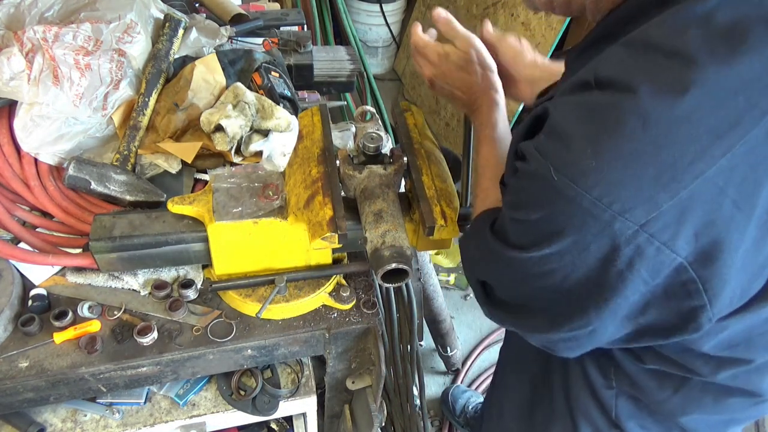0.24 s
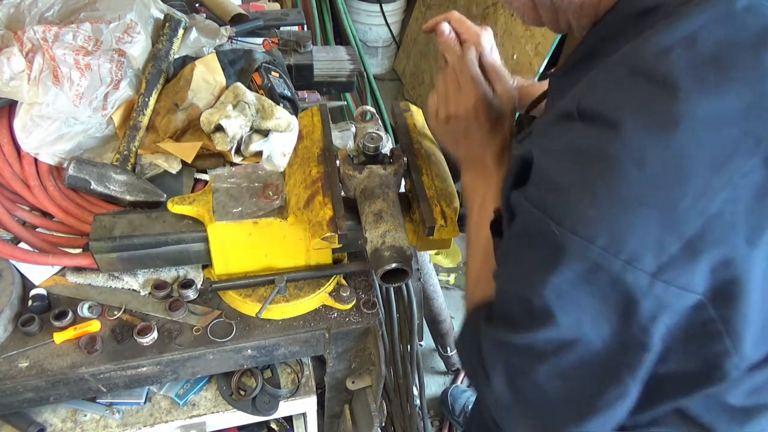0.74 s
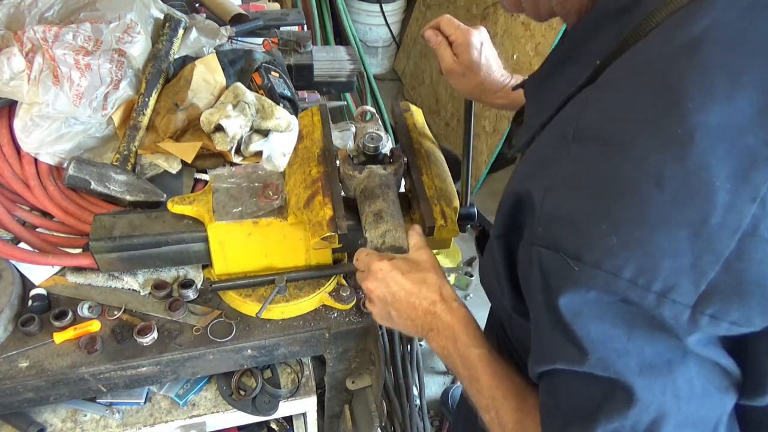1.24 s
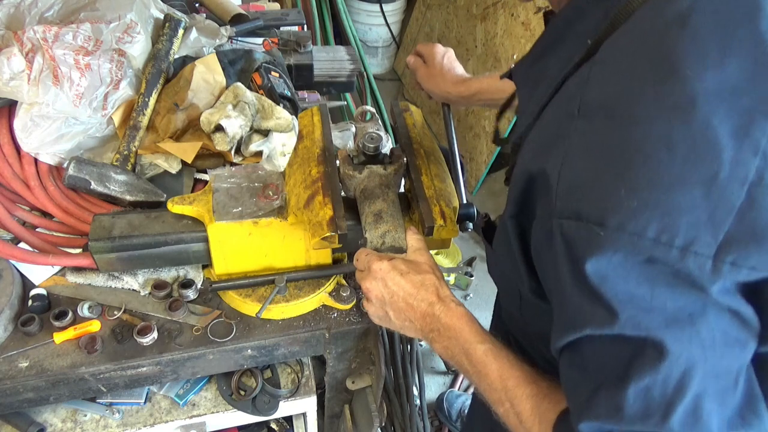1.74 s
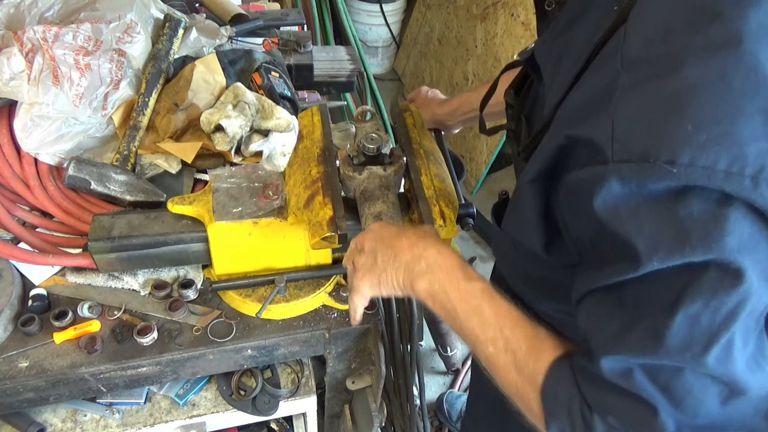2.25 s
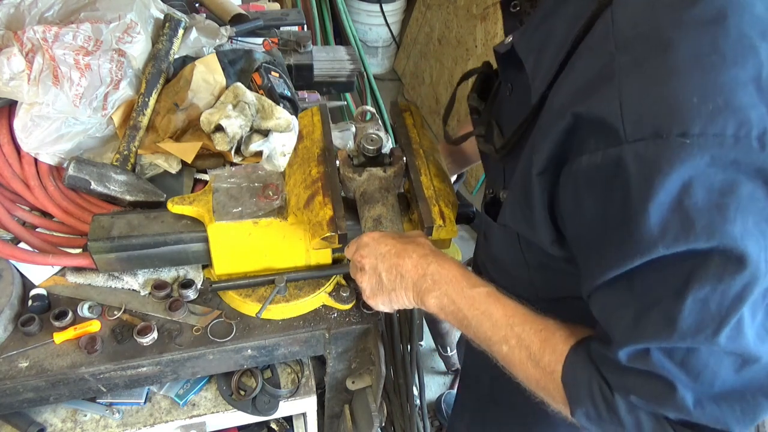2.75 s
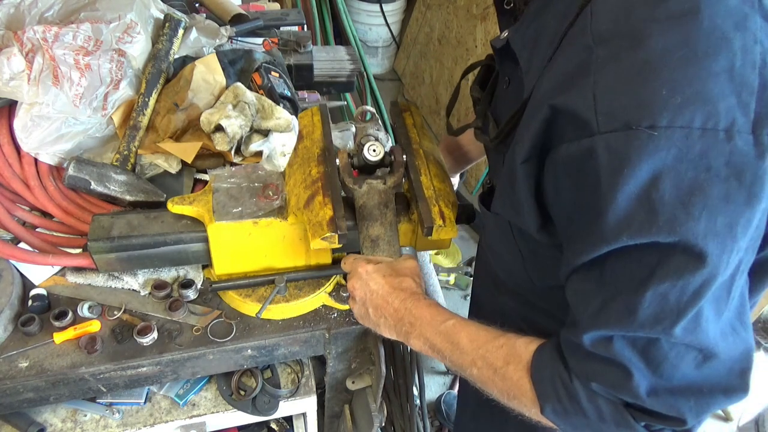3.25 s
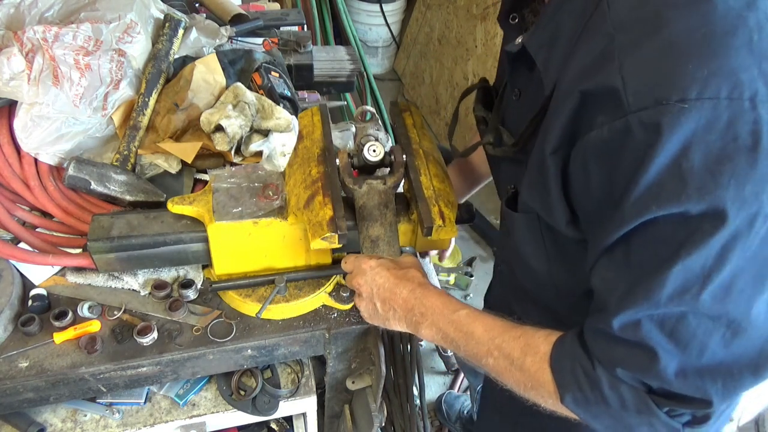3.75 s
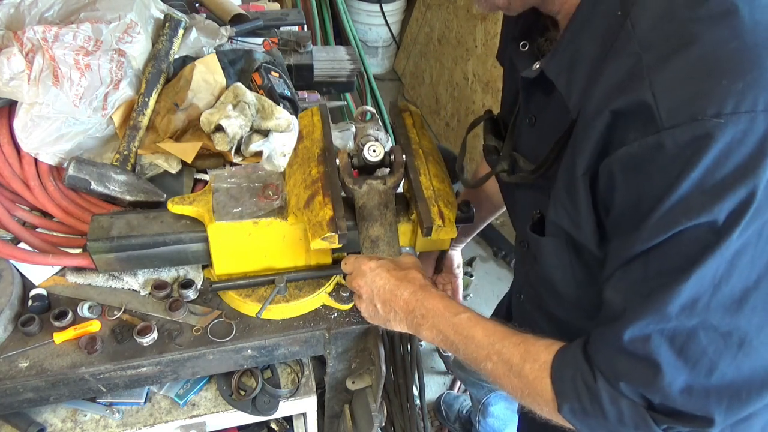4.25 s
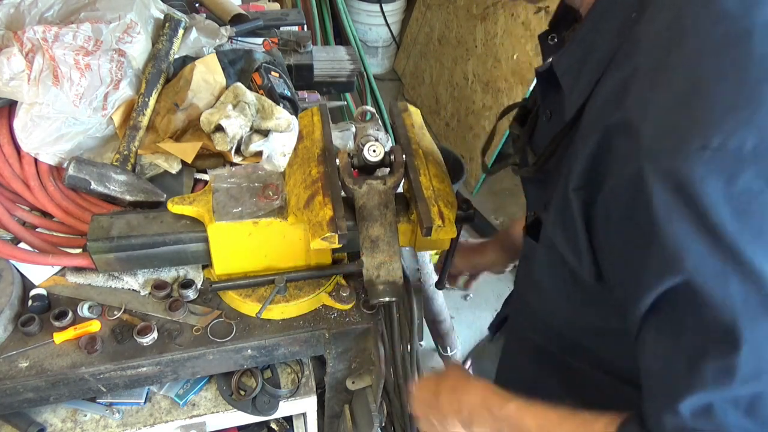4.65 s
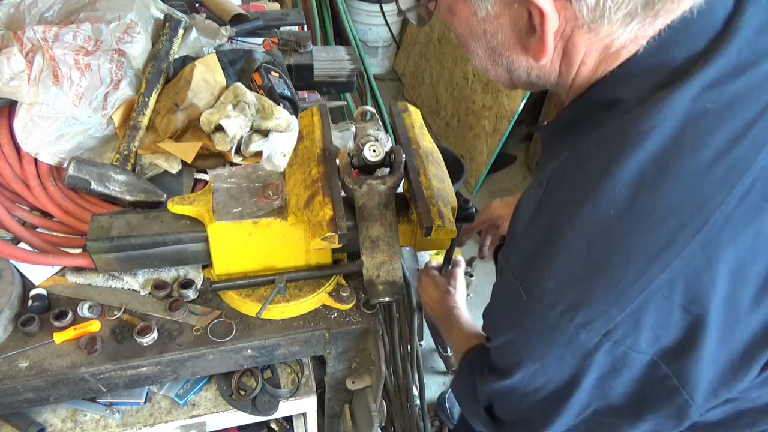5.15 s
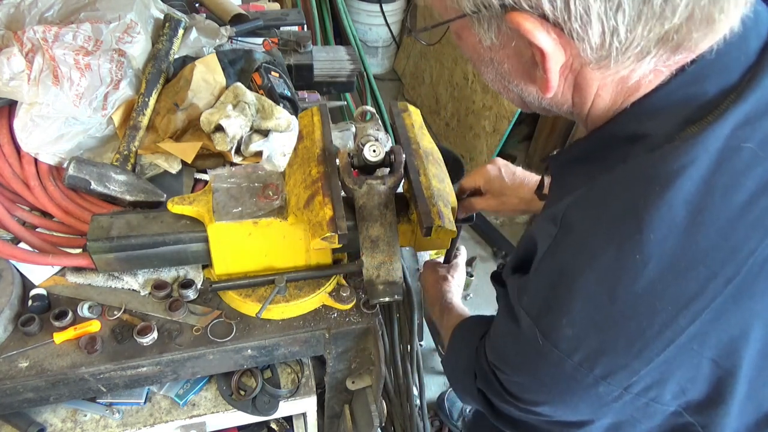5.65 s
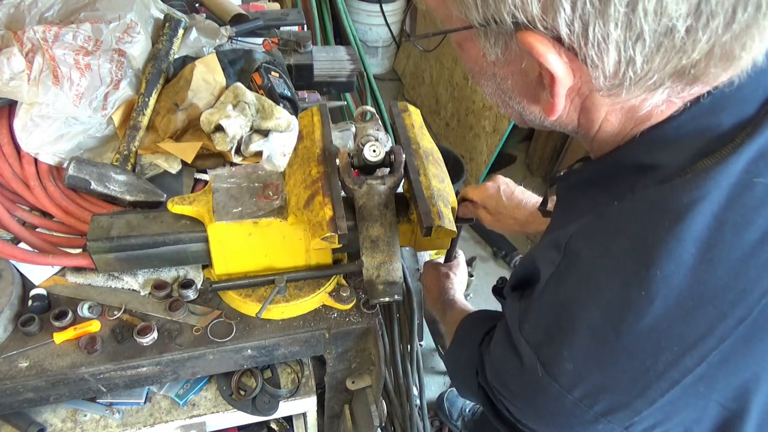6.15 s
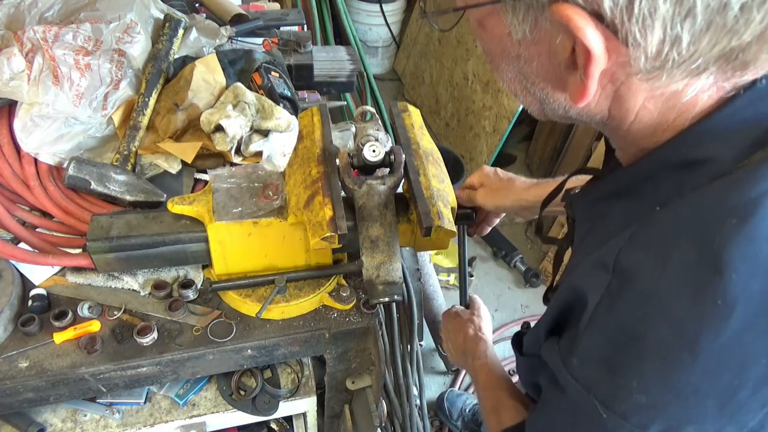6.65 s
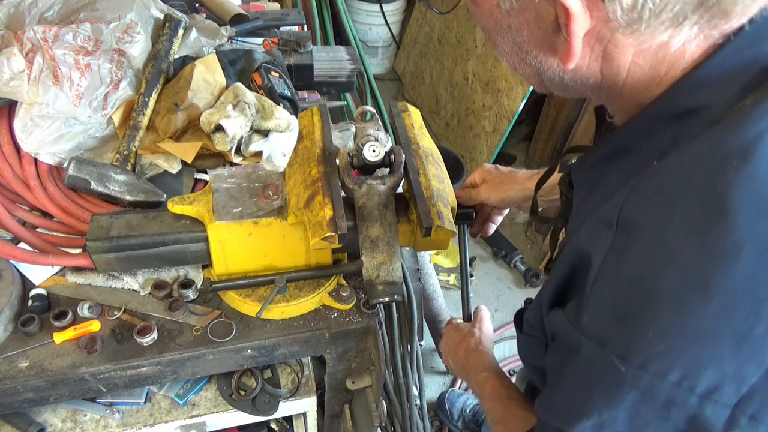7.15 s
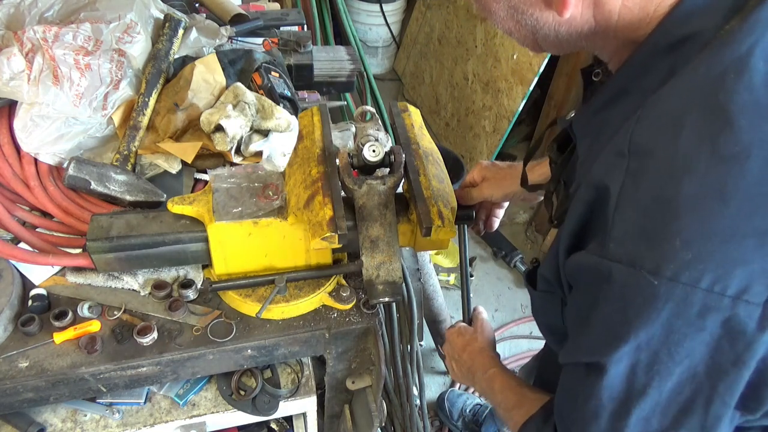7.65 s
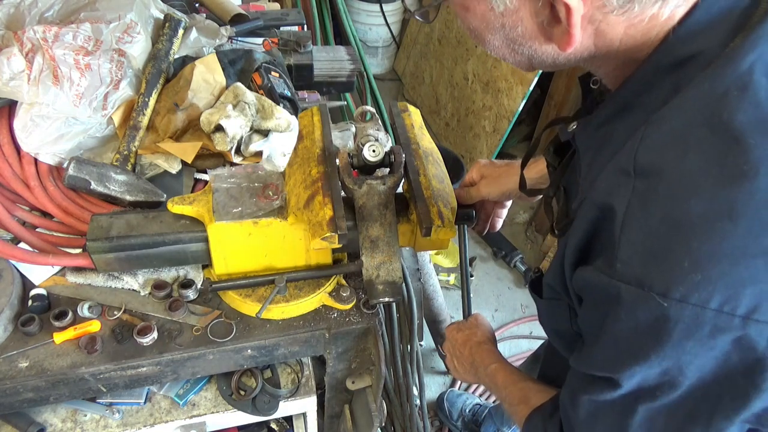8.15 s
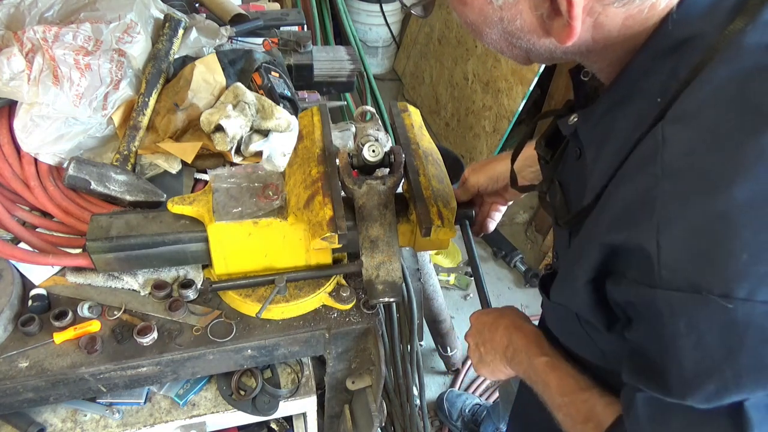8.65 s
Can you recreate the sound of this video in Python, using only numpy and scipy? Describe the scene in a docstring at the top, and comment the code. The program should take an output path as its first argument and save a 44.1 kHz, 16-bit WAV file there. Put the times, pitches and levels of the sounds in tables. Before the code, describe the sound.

A steel bench vise knocks hard, then clinks sharply as its handle bar slides, with tiny ticks and thin squeaks over a quiet open shed.

```python
"""A home workshop in an open shed, where a steel bench vise is cranked close by.
The sliding handle bar clinks and the jaws knock: each blow is a puff of noise plus the ringing of the steel.
Small parts tick as tiny puffs of noise; thin squeaks and a passing low hum are fluttering sine waves.
Behind them, shaped noise makes the wash of the shed, a drone of insects outside and brushes of a sleeve or hand."""
import sys
import numpy as np
from scipy import signal
from scipy.fft import rfft, irfft
from scipy.io import wavfile
from scipy.ndimage import uniform_filter1d

SR = 44100
rng = np.random.default_rng(int(sys.argv[2]) if len(sys.argv) > 2 else 0)


def dump(signal):
    """Clip the signal to [-1, 1] and save it as 16-bit WAV at the path in sys.argv[1]."""
    limited = np.clip(np.atleast_2d(signal).T, -1, 1)
    pcm = np.round(limited * 32767).astype(np.int16)
    wavfile.write(sys.argv[1], SR, pcm)


N = 392490  # length of the scene in samples


def gain_of(db):
    """Turns decibels into a factor for the wave."""
    return 10 ** (np.asarray(db) / 20)


def evened(x):
    """Scales a signal to an average strength (rms) of 1."""
    return x / np.sqrt(np.mean(x ** 2) + 1e-20)


def unit(gain):
    """Scales a spectrum so that its noise has rms 1."""
    return gain / np.sqrt(np.sum(gain ** 2))


def read_curve(points, hz):
    """Reads a table between its points, on a log-frequency axis."""
    f, value = np.transpose(points)
    return np.interp(np.log(hz + 1), np.log(f + 1), value)


def bell_db(hz, centre_hz, octaves):
    """A rounded hump on a log-frequency axis, 0 dB at its centre."""
    return -6 * (np.log2((hz + 1) / centre_hz) / max(octaves, .1)) ** 2


def add(mix, start_s, sound):
    """Adds a sound to the mix at a given time."""
    part = mix[round(start_s * SR):][:len(sound)]
    part += sound[:len(part)]


# Spectrum of the shed wash: (frequency [Hz], level per Hz [dB])
WASH_SPECTRUM = [(35, -38), (65, -12), (141, -5), (190, -7), (350, -2), (460, -2.5), (650, -2), (900, -3),
                 (1750, -9), (2160, -8), (2600, -8), (3500, -7.5), (6500, -10.5), (10000, -12),
                 (15500, -21)]
# Loudness of the wash: (time [s], level [dB])
WASH_LEVEL = [(0, -57.5), (4, -57), (4.8, -55), (5.6, -55.5), (8, -56.5), (8.9, -55.5)]
DEEP_SWELL_DB, DEEP_SWELL_S = 6, 1.3  # extra rumble around 90 Hz at the start, and how fast it settles


def shed_wash(hz, t):
    """Broad noise of the open shed; the lowest rumble starts stronger and settles."""
    level = gain_of(np.interp(t, *np.transpose(WASH_LEVEL)))
    rumble_db = DEEP_SWELL_DB * np.exp(-t / DEEP_SWELL_S) * gain_of(bell_db(hz, 90, 0.64))
    return unit(gain_of(read_curve(WASH_SPECTRUM, hz))) * level * gain_of(rumble_db)


# Bands of insect song: (centre [Hz], width [Hz], level [dB])
DRONE_BANDS = [(2630, 410, -5.5), (3440, 570, -2), (4020, 660, -2), (5700, 1900, -2.5), (6470, 810, 0.5),
               (7700, 1860, -5.5)]
# Loudness of the drone: (time [s], level [dB])
DRONE_LEVEL = [(0, -79), (.6, -69), (1.9, -64.5), (2.4, -62), (4, -57), (4.4, -58), (5.4, -59), (6.8, -64),
               (8.4, -55.5), (8.9, -55)]


def insect_drone(hz, t):
    """Many insects together blur into a few steady bands of noise that slowly change in loudness."""
    power = sum(gain_of(db) ** 2 * np.exp(-(2 * (hz - f) / width) ** 2) for f, width, db in DRONE_BANDS)
    return unit(np.sqrt(power)) * gain_of(np.interp(t, *np.transpose(DRONE_LEVEL)))


# Brushes of sleeve or hand: (time of the peak [s], peak level [dB], swell [s], fade [s])
BRUSHES = [(.08, -57.5, .2, 0.16), (.84, -51.5, .16, 0.13), (2.28, -61, .06, 0.046),
           (4.12, -54.5, 0.04, 0.054), (4.63, -57.5, 0.12, .13), (5.72, -61, .03, 0.47),
           (6.75, -52.5, 0.12, 0.15), (8.41, -51.5, 0.11, 0.15)]
# Spectrum of a brush: (frequency [Hz], level per Hz [dB])
BRUSH_SPECTRUM = [(500, -1), (1500, 8), (2500, 5.5), (5000, 4), (8000, 6), (11000, 6), (15000, -11)]
BRUSH_ENDS_DB = -10.5  # change in level one swell before and one fade after the peak


def brushing(hz, t):
    """Rubbing makes soft noise that swells and fades with each stroke."""
    strokes = np.zeros(len(t))
    for peak_s, db, swell, fade in BRUSHES:
        away = np.maximum((peak_s - t) / swell, (t - peak_s) / fade)
        strokes += gain_of(db + BRUSH_ENDS_DB * away)
    return unit(gain_of(read_curve(BRUSH_SPECTRUM, hz))) * uniform_filter1d(strokes, size=5)


def background(hz, t):
    """Wash, drone and brushes add as powers; slow random patches make them uneven."""
    power = shed_wash(hz, t) ** 2 + insect_drone(hz, t) ** 2 + brushing(hz, t) ** 2
    patches = rng.standard_normal((len(t), len(hz))).T
    patches = uniform_filter1d(patches, size=10, axis=0)
    patches = evened(uniform_filter1d(patches, size=14, axis=1))
    return np.sqrt(power) * gain_of(1.13 * patches)


# Likeness of left and right background noise: (frequency [Hz], likeness [0 to 1])
AIR_LIKENESS = [(60, 1), (150, 0.99), (380, 0.95), (950, 0.62), (2380, 0.58), (5980, 0.49), (15000, 1)]
# Balance of the background: (frequency [Hz], left over right [dB])
AIR_BALANCE = [(60, -0.5), (180, 0), (550, -2.0), (1650, -3), (4970, -2), (15000, 1.5)]


def air():
    """Shapes random noise, frequency by frequency and moment by moment, into the two-channel background."""
    frames, hz = N // 256 + 5, np.fft.rfftfreq(1024, 1 / SR)[:, None]
    t = np.arange(frames) * 256 / SR
    a, b, c, d = rng.standard_normal((frames, 513, 4)).T
    same = np.clip(read_curve(AIR_LIKENESS, hz), -1, 1)
    left, other = a + 1j * b, c + 1j * d
    pair = np.array([left, same * left + np.sqrt(1 - same ** 2) * other])
    lean = gain_of(read_curve(AIR_BALANCE, hz) / 2)
    shaped = pair * np.array([lean, 1 / lean]) * background(hz, t)
    return signal.istft(shaped, nperseg=1024, noverlap=768)[1][:, :N] * np.sqrt(1.5)


# Dying away of echoes: (frequency [Hz], time to fall 60 dB [s])
ECHO_DECAY = [(150, 0.54), (500, 0.36), (1500, 0.33), (4000, 0.23), (8000, 0.18), (14000, 0.32)]
# Likeness of left and right echoes: (frequency [Hz], likeness [0 to 1])
ECHO_LIKENESS = [(200, 0.99), (500, 0.93), (1000, 0.58), (2000, 0.63), (5000, 0.39), (12000, 1)]


def shed_echoes(x):
    """Sparse echoes of random sign, each frequency band dying at its own speed."""
    taps = np.zeros((2, SR // 2))
    at = np.arange(120, 22020, 20) + rng.integers(0, 20, (2, 1095))
    np.put_along_axis(taps, at, rng.choice([-1., 1.], at.shape), 1)
    hz, t, (a, b) = signal.stft(taps, SR, nperseg=256)
    same = np.clip(read_curve(ECHO_LIKENESS, hz), 0, 1)[:, None]  # close microphone ports hear the same bass
    pair = np.array([a, same * a + np.sqrt(1 - same ** 2) * b])
    fade = gain_of(-60 * t / read_curve(ECHO_DECAY, hz)[:, None])
    tail = signal.istft(pair * fade, SR, nperseg=256)[1]
    return signal.oaconvolve(x[None], tail / np.linalg.norm(tail[0]), axes=1)[:, :N]


def tone(times, db, hz, flutter, size):
    """A sine along a curve of level and pitch, its strength fluttering at random, faded at both ends."""
    t = np.arange(times[0], times[-1], 1 / SR)
    shake = 1 + flutter * evened(uniform_filter1d(rng.standard_normal(len(t)), size=size))
    wave = np.sqrt(2) * np.sin(2 * np.pi * np.cumsum(np.interp(t, times, hz)) / SR)
    return gain_of(np.interp(t, times, db)) * shake * wave * signal.windows.tukey(len(t), .15)


HUM_S = (1.1, 2.8, 3.5)  # start, peak and end
HUM_HZ, HUM_RISE_HZ = 154.5, 2.13  # first pitch, and total rise
HUM_DB, HUM_ENDS_DB = -77.5, -5  # level at the peak, and change at both ends


def low_hum():
    """A faint low tone passes once, rising a little in pitch."""
    out = np.zeros(N)
    level = HUM_DB + HUM_ENDS_DB * np.array([1, 0, 1])
    hz = HUM_HZ + HUM_RISE_HZ * np.array([0, .5, 1])
    add(out, HUM_S[0], tone(HUM_S, level, hz, flutter=0.3, size=9000))
    return out


# Thin squeaks: (start [s], length [s], share of it before the peak [0 to 1], peak level [dB],
# first pitch [Hz], last pitch [Hz], flutter speed [Hz])
SQUEAKS = [(0.619, .19, 0.69, -65.5, 1387, 1430, 500), (1.233, 0.094, .36, -60, 3550, 4060, 220),
           (2.151, 0.068, 0.35, -61, 4110, 4060, 220), (2.723, 0.033, .25, -58, 2520, 2550, 220),
           (3.47, 0.079, .3, -62, 3950, 4010, 220), (4.32, .16, .3, -65.5, 6900, 7700, 1500),
           (4.43, 0.14, 0.66, -63, 4110, 4080, 220), (4.527, 0.077, .25, -59, 3970, 3930, 221),
           (6.431, .1, .25, -62, 4040, 3990, 220), (7.34, 0.096, 0.43, -62.5, 3950, 4000, 220),
           (7.41, .09, 0.41, -70, 7650, 7830, 1500), (8.805, 0.099, .35, -61.5, 3720, 3920, 700)]
SQUEAK_START_DB, SQUEAK_END_DB = -3.5, -9  # relative to the peak
FLUTTER_DEPTH, FLUTTER_HZ = 0.79, 220.  # depth of flutter at this speed


def squeaks():
    """Thin tones swell, glide until the peak, then hold their pitch and fade."""
    out = np.zeros(N)
    for start_s, length, top, db, first_hz, last_hz, flutter_hz in SQUEAKS:
        times = start_s + length * np.array([0, np.clip(top, 0, 1), 1])
        level = [db + SQUEAK_START_DB, db, db + SQUEAK_END_DB]
        # faster flutter is also deeper, turning a peep into a rasp
        depth = FLUTTER_DEPTH * np.sqrt(flutter_hz / FLUTTER_HZ)
        hz = [first_hz, last_hz, last_hz]
        add(out, start_s, tone(times, level, hz, flutter=depth, size=int(SR / flutter_hz)))
    return out


def crack(centre_hz, octaves, t60, rise_s, size):
    """A dying puff of noise coloured around a centre, peak near 1."""
    spectrum = rfft(rng.standard_normal(size))
    colour = gain_of(bell_db(np.fft.rfftfreq(size, 1 / SR), centre_hz, octaves))
    noise = irfft(spectrum * colour, size)
    t = np.arange(size) / SR
    return evened(noise) / 2 * gain_of(-60 * t / max(t60, .002)) * np.minimum(t / rise_s, 1)


# Small ticks: (time [s], peak level [dB], centre [Hz])
TICKS = [(.509, -42, 4900), (0.5392, -26.5, 7900), (.572, -28, 10000), (0.575, -29.5, 9500),
         (0.612, -35.5, 2280), (.618, -39, 6500), (0.6333, -33, 7500), (1.15, -27, 11000),
         (1.1875, -37, 11000), (1.209, -41, 8000), (1.254, -37, 7500), (1.258, -44, 1070),
         (1.277, -39, 3300), (1.3083, -32, 11500), (1.8315, -34, 6420), (1.8702, -37, 8000),
         (2.099, -32.5, 11600), (2.166, -27.5, 7800), (2.2464, -36, 11000), (2.7092, -35, 9500),
         (2.8425, -33, 10500), (2.851, -33.5, 5900), (3.0031, -38.5, 3600), (3.173, -27, 10500),
         (4.3117, -31, 11300), (4.5917, -23.5, 8550), (5.3359, -37, 7960), (5.342, -42, 2000),
         (6.0486, -24, 5470), (6.051, -33, 3570), (6.089, -29, 6400), (6.123, -30, 7900),
         (6.485, -38, 2980), (6.505, -38, 3500), (6.8948, -27, 9400), (7.132, -32, 11000),
         (8.2063, -39, 9000), (8.245, -27.5, 8400)]
TICK_T60, TICK_OCTAVES = 0.0081, 0.71  # time to fall 60 dB [s], and spread of the spectrum
PING_HZ = 5100  # ticks pitched below this ring longer and narrower
FAINT_PER_S, FAINT_DB, FAINT_HZ = 1.5, -44, (7000, 12000)  # fainter ticks fall at random


def ticks():
    """Small parts settle with tiny dry cracks."""
    out = np.zeros(N)
    when, pitch = rng.random((round(FAINT_PER_S * N / SR), 2)).T
    low, high = FAINT_HZ
    faint = [(a * N / SR, FAINT_DB, low * (high / low) ** b) for a, b in zip(when, pitch)]
    for start_s, db, centre_hz in TICKS + faint:
        ping = max(PING_HZ / centre_hz, 1)
        puff = crack(centre_hz, TICK_OCTAVES / ping, TICK_T60 * ping, rise_s=0.00035, size=4096)
        add(out, start_s, gain_of(db) * puff)
    return out


# Shakes of the microphone's mount by the bench: (time [s], peak level [dB], length [s])
JOLTS = [(1.637, -42, 0.0044), (5.09, -55, 0.0031)]


def jolts():
    """Two heavy blows each push the microphone's mount once, as a short smooth bump."""
    out = np.zeros(N)
    for start_s, db, length in JOLTS:
        add(out, start_s, gain_of(db) * signal.windows.hann(round(length * SR)))
    return out


def ring(modes, blow_db, centre_hz, octaves, length, rough):
    """The ringing tones of one body, weighted by the spectrum of the blow; loose parts make each waver."""
    phase = rng.random(len(modes)) * 2 * np.pi
    knots = rng.standard_normal((len(modes), 2, 150)) * rough
    out = np.zeros(SR // 3)
    for (hz, db, t60), p, (a, b) in zip(modes, phase, knots):
        start_db = blow_db + db + bell_db(hz, centre_hz, octaves)
        audible_samples = (start_db + 85) / 60 * t60 * SR  # until it dies away
        t = np.arange(int(np.clip(audible_samples, 0, len(out)))) / SR
        depth = min(hz / 1500, 1, 0.15 / t60)  # low or long rings are steadier
        waver = np.interp(t, np.arange(len(a)) * .0023, 1 + (a + 1j * b) * depth)
        rise = 1 - np.exp(-t / (0.087 * length))  # the ring builds while the parts touch
        wave = (waver * np.exp(1j * (2 * np.pi * hz * t + p))).imag
        add(out, 0, gain_of(start_db - 60 * t / t60) * rise * wave)
    return out


# Ringing tones of the handle bar: (frequency [Hz], level [dB], time to fall 60 dB [s])
HANDLE_MODES = [(675, -6, 0.14), (1432, -10.5, .14), (1666, -8, 0.14), (2023, -12, 0.11), (2383, -13, 0.17),
                (2525, -6.5, 0.14), (2900, -27, 0.047), (3330, -22, 0.13), (3730, -20, 0.066),
                (4380, -5, 0.061), (4635, -2.5, 0.056), (5180, 7, 0.03), (6120, -14, .07),
                (6020, -11, 0.053), (6430, -3, 0.091), (7370, -5, .05), (7890, 3, 0.06), (8533, -19, .06),
                (9650, -26, .06)]
# Ringing tones of the vise: (frequency [Hz], level [dB], time to fall 60 dB [s])
VISE_MODES = [(208.2, -11, 0.34), (273, -13, 0.25), (330.6, -8.5, 0.24), (378, -7.5, 0.15),
              (440.4, -8, 0.31), (499, -2.5, 0.12), (566, -10, 0.11), (613, -11.5, 0.52), (676, 0.5, 0.11),
              (838, -9, 0.22), (1092, -15.5, 0.23), (1189, -4.5, 0.099), (1260, -7.5, 0.11),
              (1474, -11, 0.059), (1650, -4, 0.084), (1780, -19, 0.4), (1990, -17, 0.072), (2150, -19, .1),
              (2440, -43, 0.1), (3657, 1, 0.045), (4290, -13, 0.068), (4380, -2.5, 0.039),
              (4630, -2.5, 0.061), (5370, -6, 0.06), (6140, -22.5, 0.046), (6940, -13, .06),
              (8160, -21, 0.1), (9590, 1, 0.034), (11030, -13, .1)]
# Ringing tones of the yoke: (frequency [Hz], level [dB], time to fall 60 dB [s])
YOKE_MODES = [(706, 2, 0.12), (1180, -13, 0.093), (2330, -21, 0.046), (2480, -15, 0.11), (2550, -14, 0.066),
              (3160, -32, 0.098), (3777, -4, 0.029), (4110, -15, 0.077), (4260, -10.5, 0.036),
              (4920, -29, 0.05), (5180, -14, 0.047), (6000, -12.5, 0.035), (6638, -17.5, 0.12),
              (7660, -21, 0.031), (7820, -6.5, 0.044), (9000, -14, 0.05), (10050, -9, 0.026)]
# Contacts: (time [s], body struck, ring level [dB], crack level [dB], centre of the blow [Hz], contact [s])
BLOWS = [(1.636, "vise", -21, -11, 1830, 0.0079), (1.6394, "vise", -21, -12, 566, 0.0088),
         (1.6432, "vise", -29, -12, 5600, 0.0061), (1.66, "vise", -41, -27, 1510, 0.0049),
         (1.681, "vise", -56, -25, 1200, 0.011), (1.71, "vise", -51, -30, 3460, 0.015),
         (3.683, "yoke", -54, -33, 3000, 0.018), (3.6941, "yoke", -25.5, -15, 5800, 0.0044),
         (3.698, "yoke", -24.5, -25, 3780, 0.0029), (3.714, "yoke", -42, -38, 4000, .0054),
         (4.103, "yoke", -49, -42, 2400, .0066), (5.0822, "handle", -32.5, -25, 3800, 0.013),
         (5.0957, "handle", -25, -23, 5850, .0031), (5.098, "handle", -26.5, -10.5, 4000, 0.0063),
         (5.102, "vise", -45, -39, 280, 0.021), (5.177, "vise", -43, -26, 2520, 0.014),
         (5.195, "vise", -41.5, -27, 1620, 0.011), (5.204, "handle", -45.5, -29, 1890, 0.0032),
         (5.218, "vise", -58, -34, 2320, 0.0083), (5.367, "vise", -54, -41.5, 880, 0.022),
         (5.383, "handle", -50, -50, 795, .0059), (5.493, "vise", -57, -55, 700, 0.0069)]
# Change in ring level of each body, by body struck: (handle [dB], vise [dB], yoke [dB])
PASSED_ON = {"handle": (0, -11, 0.5), "vise": (-29, 0, -15.5), "yoke": (-17, -24, 0)}
# Spread of the tones a blow wakes, by body struck: [octaves]
RING_OCTAVES = {"handle": 1.75, "vise": 1.25, "yoke": 1.17}
BLOW_OCTAVES = 1.05  # spread of a crack's spectrum around its centre


def blows():
    """Each contact gives a crack that grows with its length, rings the body struck and shakes its neighbours."""
    out = np.zeros(N)
    for start_s, body, ring_db, crack_db, centre_hz, length in BLOWS:
        for modes, db in zip((HANDLE_MODES, VISE_MODES, YOKE_MODES), PASSED_ON[body]):
            ringing = ring(modes, ring_db + db, centre_hz, RING_OCTAVES[body], length, rough=1.0)
            add(out, start_s, ringing)
        rise_s = 25 * length ** 2  # long contacts start softly
        puff = crack(centre_hz, BLOW_OCTAVES, 4.9 * length, rise_s, size=8192)
        add(out, start_s, gain_of(crack_db) * puff)
    # the bench radiates little deep bass
    return signal.sosfilt(signal.butter(2, 220, "high", fs=SR, output="sos"), out)


def scene():
    """Blows sit a little left, small sounds a little right, with echoes and background around them."""
    hits = blows()
    small = ticks() + squeaks() + low_hum()
    near = hits * gain_of([[.6], [-.6]]) + small * gain_of([[-.4], [.4]]) + jolts()
    return near + shed_echoes(gain_of(-7.0) * (hits + small)) + air()


# Microphone colour: (frequency [Hz], level [dB])
MIC_COLOUR = [(9500, 1.5), (11000, -5.5), (13000, -10), (16000, -29)]
SELF_NOISE_DB, EDGE_HZ = -68, 15800  # amplifier hiss, and upper band limit


def record(dry):
    """Microphone colour, amplifier hiss that is nearly alike on both sides, then the band limit."""
    hz = np.linspace(0, SR / 2, 129)
    colour = signal.firwin2(255, hz, gain_of(read_curve(MIC_COLOUR, hz)), fs=SR)
    coloured = signal.oaconvolve(dry, colour[None], "same")
    amplifier = evened(rng.standard_normal(N) + 0.059 * rng.standard_normal((2, N)))
    noisy = coloured + gain_of(SELF_NOISE_DB) * amplifier
    band_limit = signal.firwin(511, EDGE_HZ, window=("kaiser", 9), fs=SR)
    return signal.oaconvolve(noisy, band_limit[None], "same")


dry = scene()
out = record(dry)
dump(out)
```